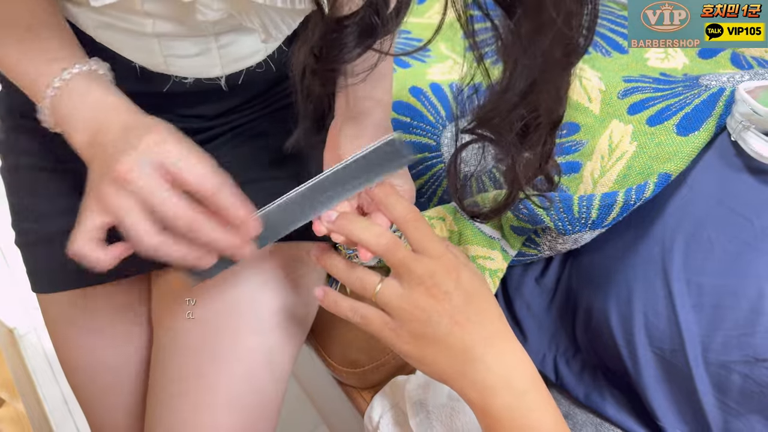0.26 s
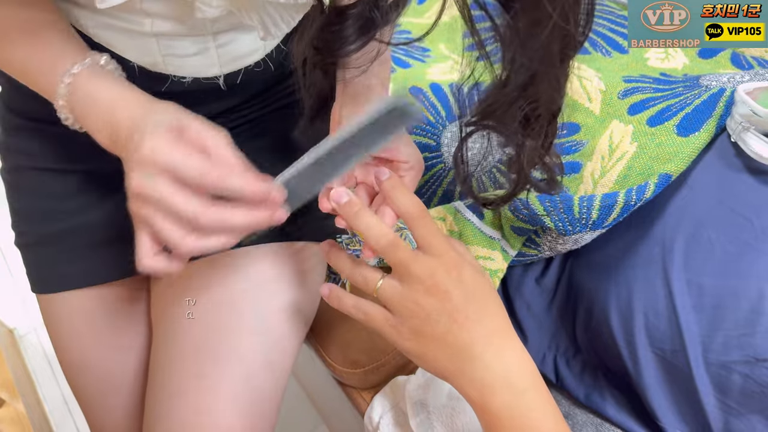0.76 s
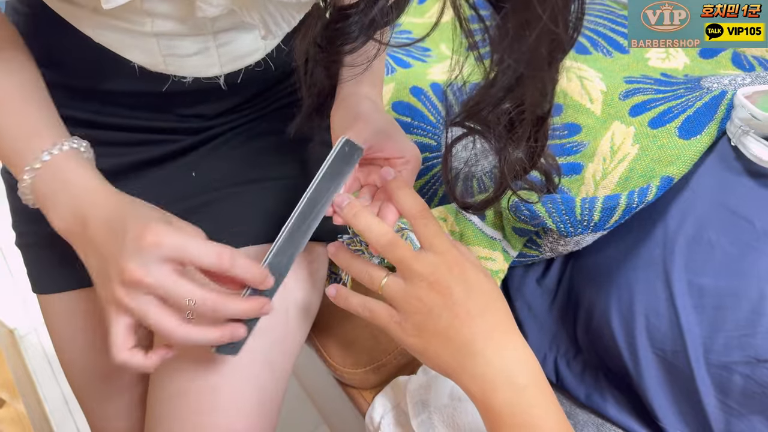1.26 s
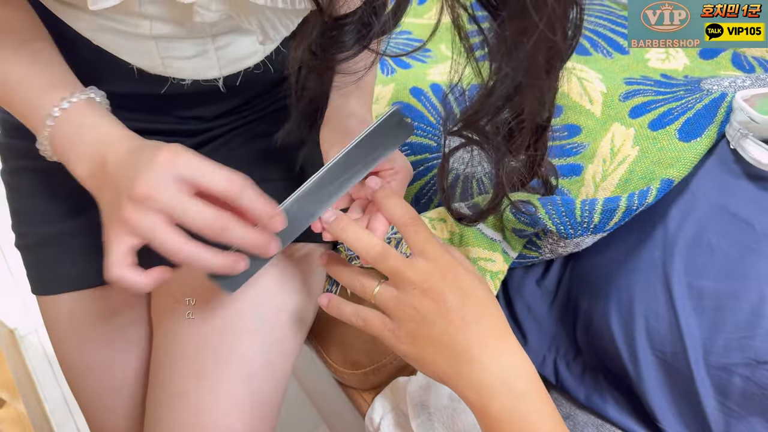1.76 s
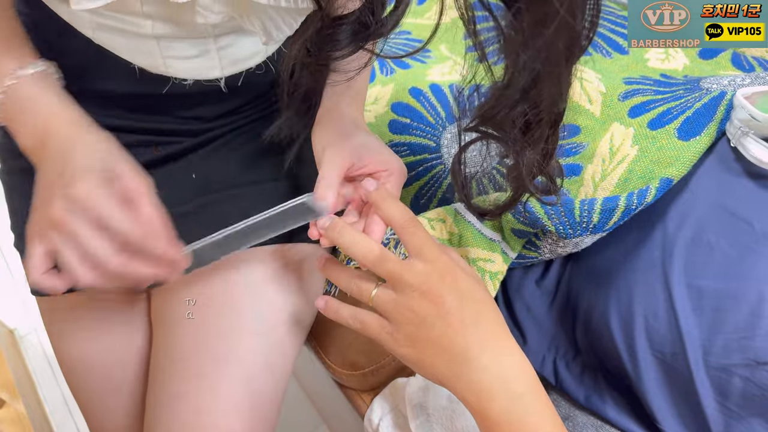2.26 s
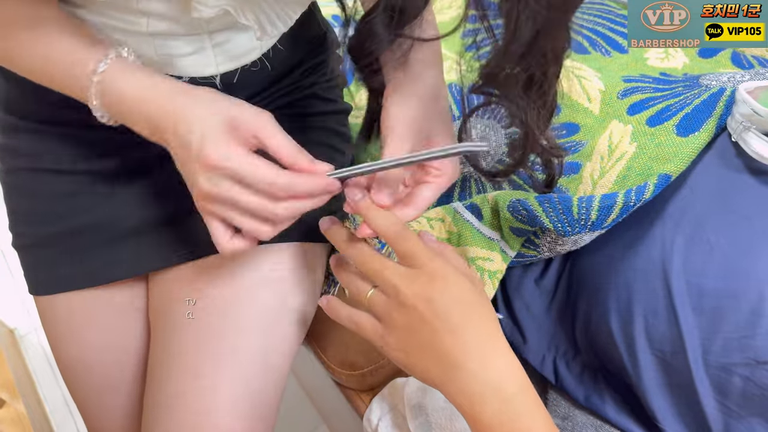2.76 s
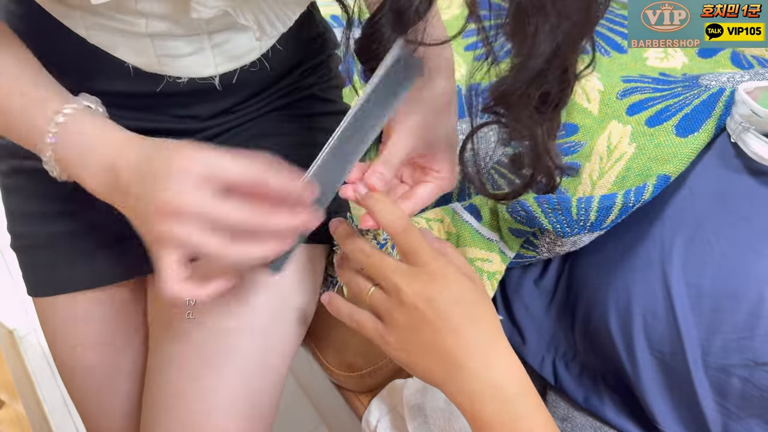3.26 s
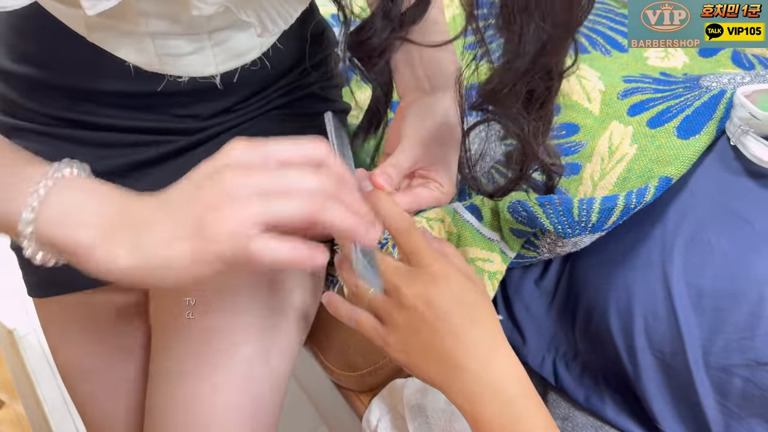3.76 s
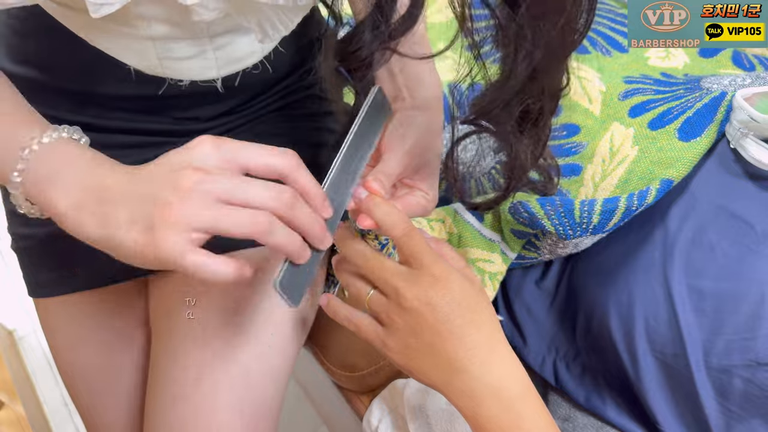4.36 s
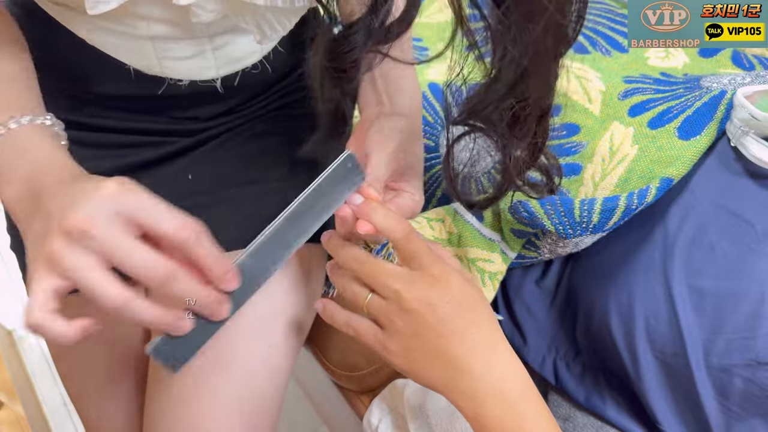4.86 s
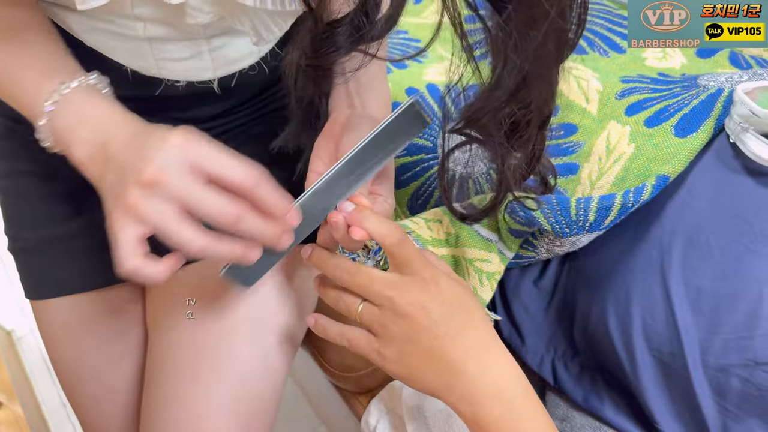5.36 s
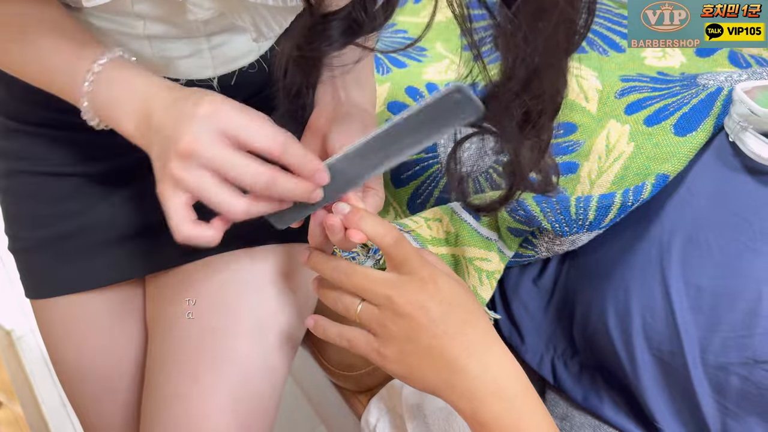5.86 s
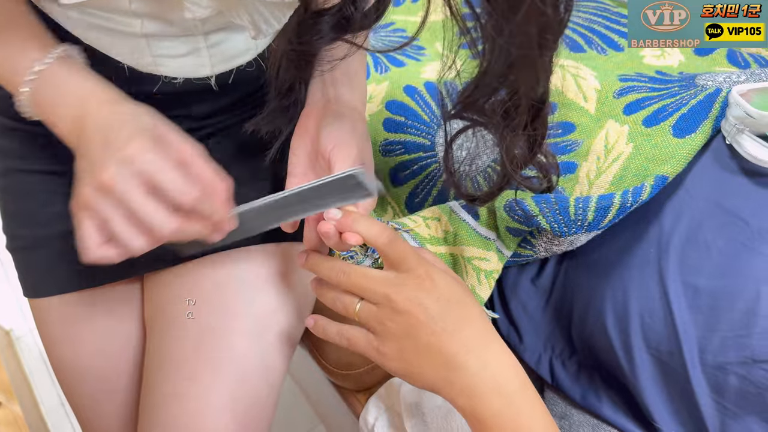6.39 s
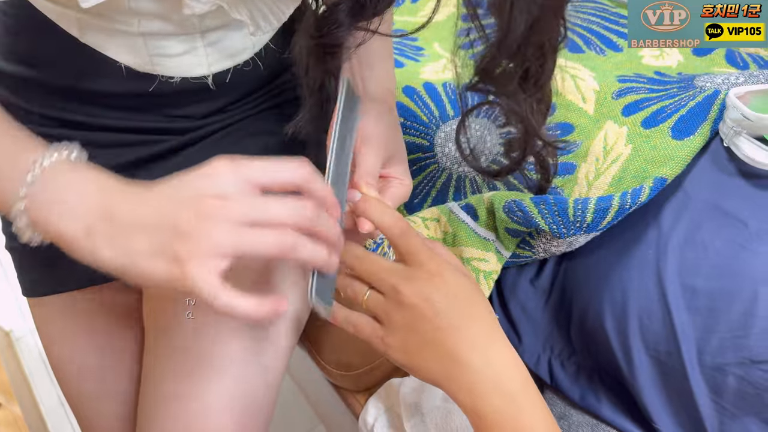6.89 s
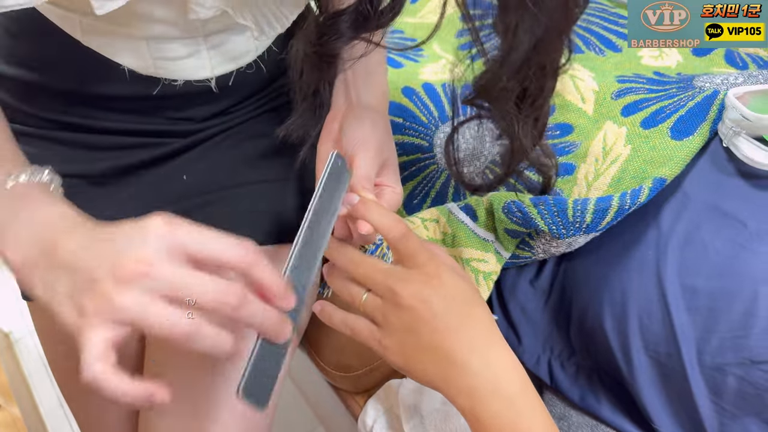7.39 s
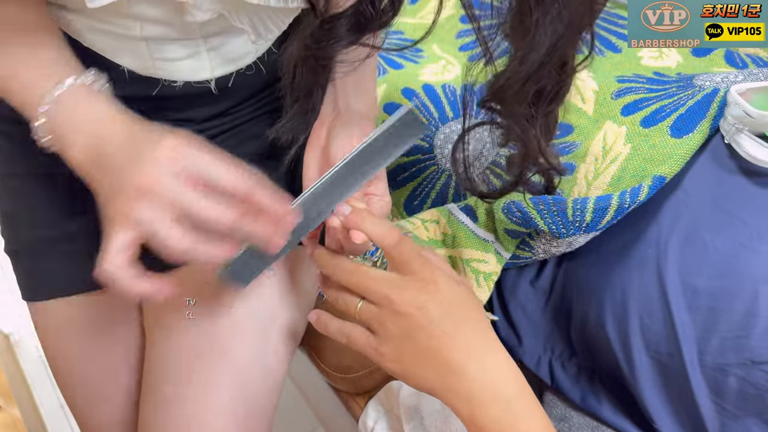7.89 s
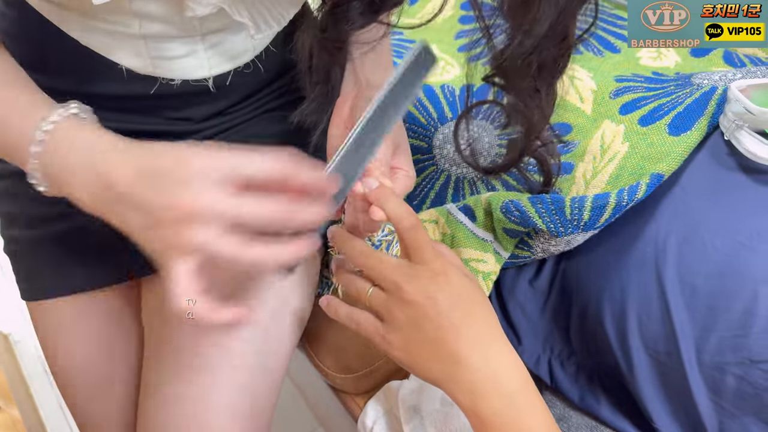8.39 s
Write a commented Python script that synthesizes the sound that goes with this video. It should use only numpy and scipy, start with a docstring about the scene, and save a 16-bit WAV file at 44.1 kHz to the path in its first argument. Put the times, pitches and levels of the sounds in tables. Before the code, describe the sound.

An emery board rasps back and forth over fingernails, close to the microphone in a small shop. The dry, bright strokes come about six a second, in runs broken by short pauses, with the longest run in the middle. Now and then the grit catches with a sharp tick. The hard room carries each stroke on briefly, and ventilation hums low underneath throughout.

```python
"""Filing nails in a small shop

An emery board rasps back and forth over fingernails, close to a two-port microphone. Its grit ticks
against the nail edge, the board rings, and now and then a coarse grain catches. A small hard room
carries each stroke on for a moment. Ventilation adds a low wash and a few wavering hum tones."""
import sys
import numpy as np
from scipy import signal
from scipy.fft import rfft, irfft, next_fast_len
from scipy.io import wavfile
from scipy.ndimage import uniform_filter1d

SR = 44100
rng = np.random.default_rng(int(sys.argv[2]) if len(sys.argv) > 2 else 0)


def generate_wav(sig):
    """Save sig (samples, or channels by samples) to the path in sys.argv[1] as 16-bit PCM at SR."""
    pcm = np.round(np.clip(np.atleast_2d(sig).T, -1, 1) * 32767).astype(np.int16)
    wavfile.write(sys.argv[1], SR, pcm)


N = 380583


def gain_of(db):
    return 10 ** (np.asarray(db) / 20)


def unit_rms(x):
    return x / np.sqrt(np.mean(x ** 2) + 1e-20)


def curve_at(points, hz, column=1):
    table = np.transpose(points)
    return np.interp(np.log(hz + 1), np.log(table[0] + 1), table[column])


def add(mix, start_s, sound):
    part = mix[:, round(start_s * SR):][:, :sound.shape[1]]
    part += sound[:, :part.shape[1]]


def impulse_response(gain):
    """Minimum-phase taps, energy 1, for a gain given over the full circle of frequencies."""
    log_spectrum = np.conj(signal.hilbert(np.log(gain + 1e-5)))
    taps = np.fft.ifft(np.exp(log_spectrum)).real[:len(gain) // 2]
    return taps[None] / np.linalg.norm(taps)


def drift(top_hz, count):
    """Slow wandering curves: sines of random phase, strongest at the slowest."""
    t, hz = np.arange(0, N + 64, 64) / SR, np.geomspace(.15, top_hz, 20)[:, None]
    sines = np.sin(2 * np.pi * (hz * t + rng.random((count, *hz.shape)))) / np.sqrt(hz)
    return np.array([np.interp(np.arange(N) / SR, t, unit_rms(row)) for row in sines.sum(1)])


# The hand's strokes. Each row: start in seconds, length in seconds, peak pressure in dB, place of the
# peak from 0 to 1, board level against the grit in dB, tilt of the grit's top end in dB per octave.
STROKES = [(-0.1, 0.15, -43.5, 0.37, -14.5, -1), (0.048, 0.16, -41.5, 0.55, -15, 2),
           (0.229, 0.17, -40, 0.54, -14, -7), (1.034, 0.21, -47, 0.6, -17, -4),
           (1.26, 0.14, -42.5, 0.58, -18, 1), (1.42, 0.12, -40, 0.5, -20, -2.5),
           (1.57, 0.16, -45.5, 0.49, -13.5, -11), (1.728, 0.18, -45, 0.58, -17.5, -11),
           (1.925, 0.15, -45, 0.48, -14, -13), (2.075, 0.24, -45, 0.67, -15.5, -13),
           (2.77, 0.22, -40.5, 0.66, -10.5, 5.5), (3.362, 0.21, -40.5, 0.57, -16, 3),
           (3.581, 0.12, -41, 0.6, -11.5, -3.5), (3.721, 0.16, -44, 0.62, -11.5, -11),
           (3.895, 0.14, -42.5, 0.55, -13, 0), (4.061, 0.13, -41, 0.47, -15.5, 2),
           (4.218, 0.14, -41.5, 0.39, -17.5, 6), (4.371, 0.13, -37.5, 0.55, -17, 1),
           (4.515, 0.18, -39, 0.66, -17.5, 9), (4.72, 0.16, -45, 0.39, -16, 0),
           (4.899, 0.13, -40, 0.49, -17, 1.5), (5.062, 0.154, -44.5, 0.55, -17.5, -7.5),
           (5.251, 0.11, -39, 0.51, -16.5, 1.5), (5.419, 0.17, -38, 0.5, -19, -4.5),
           (5.924, 0.16, -43.5, 0.38, -13.5, -5.5), (6.1, 0.14, -47.5, 0.43, -11, -6.5),
           (6.281, 0.23, -43, 0.63, -14.5, -9), (6.858, 0.18, -40.5, 0.56, -16.5, 8),
           (7.041, 0.16, -44.5, 0.47, -12, 4), (7.21, 0.15, -41, 0.58, -17, -6.5),
           (7.389, 0.15, -40, 0.49, -16, 12.5), (7.584, 0.15, -42.5, 0.4, -19.5, 5),
           (7.771, 0.16, -44.5, 0.53, -18, 2), (7.98, 0.11, -43.5, 0.65, -16, -8),
           (8.503, 0.22, -44, 0.5, -19.5, -5)]
EDGE_S = .002  # fade as the board meets or leaves the nail


def strokes(turn_speed=.027, grit_power=.98, board_power=.67, ring_up_s=.0051):
    """Pressure follows the arch of hand speed; the board's ring builds later and follows more gently."""
    t, touching = np.arange(N) / SR, contact()
    keep = np.exp(-1 / (ring_up_s * SR))
    lagging = signal.lfilter([1 - keep], [1, -keep], touching - 1) + 1
    gates = np.array([touching, np.minimum(touching, lagging)])[:, None]
    powers = np.array([grit_power, board_power])[:, None, None]
    for start, length, db, peak_place, board_db, tilt_db in STROKES:
        span = slice(max(round(start * SR), 0), round((start + length) * SR))
        skew = np.log(.5) / np.log(peak_place)
        progress = np.clip((t[span] - start) / length, 0, 1) ** skew
        speed = turn_speed + (1 - turn_speed) * np.sin(np.pi * progress)
        yield span.start, gain_of(db) * speed ** powers * gates[..., span], board_db, tilt_db


# Nail and grip colour the board's ring. Each row: time in seconds, then low, middle and high modes in dB.
GRIP = [(.2, 2.5, -2, -3.5), (1.1, -4.5, 0.5, 1), (2.3, -9, -8, -5), (2.85, 0, -14, -1.5),
        (3.45, 4.5, 0, 0), (3.9, -0.5, 4.5, 3.5), (4.6, 2.5, -0.5, 1), (6.0, 1.5, 1.5, -3),
        (6.4, -4, -12, -7.5), (7.0, 5, -1, 2.5), (8.1, -5, 0, -1.5)]


def rasp(grains_per_s=9000, spread_db=3.1, clump_db=1.2, clump_s=.0012):
    """Grains of uneven size tick against the nail in clumps, as hard as the hand presses."""
    count = N + SR
    clumps = unit_rms(uniform_filter1d(rng.standard_normal(count), round(clump_s * SR)))
    sizes = gain_of(spread_db * np.minimum(rng.exponential(1, count), 4) + clump_db * clumps)
    ticks = sizes * (rng.random(count) < grains_per_s / SR)
    jolts = np.sqrt(ticks)  # the board's mass evens out large and small grains
    grains = np.array([[unit_rms(ticks)], [unit_rms(jolts)]]) * rng.choice([-1., 1.], (2, 2, count))
    grip_times, *grip_levels = np.transpose(GRIP)
    out = np.zeros((2, N))
    for at, pressure, board_db, tilt_db in [*strokes(), *grazes()]:
        drive = pressure * grains[..., at:at + pressure.shape[-1]]
        groups_db = [np.interp(at / SR, grip_times, db) for db in grip_levels]
        add(out, at / SR, scrape(drive, board_db, tilt_db, groups_db))
    return out


# The grit's bright hiss. Each row: frequency in Hz, relative level in dB.
GRIT_SPECTRUM = [(4000, -23), (6700, -16), (7600, -11.5), (9000, -1.5), (10300, 0.5), (11200, 0.5),
                 (11900, 3), (14000, -1), (15800, -4)]
# The board's resonances. Each row: frequency in Hz, width in Hz, relative level in dB.
BOARD_MODES = [(562, 253, 0), (1100, 380, -2), (1890, 720, -5), (2780, 790, -5), (3466, 455, -1),
               (4480, 660, -2), (5390, 610, 1), (6090, 800, -0.5), (7540, 560, 1.5)]
# Upper ends of the low, middle and high groups of modes, in Hz.
GROUP_TOPS_HZ = [2400, 3100, 4900]


def scrape(drive, board_db, tilt_db, groups_db):
    """The first drive signal makes the grit hiss, the second rings the board's modes."""
    hz = abs(np.fft.fftfreq(1024, 1 / SR))
    grit_db = curve_at(GRIT_SPECTRUM, hz) + tilt_db * np.log2(np.clip(hz / 11500, .7, 1.2))
    board_power = np.zeros_like(hz)
    for mode_hz, width, db in BOARD_MODES:
        group_db = [*groups_db, 0][np.searchsorted(GROUP_TOPS_HZ, mode_hz)]
        board_power += gain_of(db + group_db) ** 2 / (1 + (2 * (hz - mode_hz) / width) ** 4)
    hiss = signal.fftconvolve(drive[0], impulse_response(gain_of(grit_db)), axes=1)
    ring = signal.fftconvolve(drive[1], impulse_response(np.sqrt(board_power)), axes=1)
    return hiss + gain_of(board_db) * ring


# Shimmer on the rasp. Each row: frequency in Hz, typical depth in dB.
SHIMMER_DEPTH = [(6000, 4.8), (12000, 2.4)]


def rasp_shimmer(x):
    """Small random peaks come and go over the rasp's spectrum, giving it a faint ringing shimmer."""
    hz, t, spectrum = signal.stft(x, SR, nperseg=512, noverlap=384)
    lingering = uniform_filter1d(rng.standard_normal((len(t), len(hz))), size=12, axis=0)
    peaks = unit_rms(uniform_filter1d(lingering, size=2, axis=1)).T
    gain = gain_of(curve_at(SHIMMER_DEPTH, hz)[:, None] * peaks)
    gain /= np.sqrt(np.mean(gain ** 2, axis=1, keepdims=True))
    return signal.istft(spectrum * gain, SR, nperseg=512, noverlap=384)[1][:, :N]


# The room's tail. Each row: frequency in Hz, seconds to fall 60 dB, level against the dry sound in dB.
ROOM_TAIL = [(983, 0.68, -9), (3930, 0.44, -1.5), (7250, 0.55, -8), (9600, 0.48, -13.5), (15600, 0.19, -10)]


def room(x):
    """Sparse reflections, each band dying at its own speed; soft furnishings soak up the treble."""
    taps = np.zeros((2, 30000))
    slots = np.arange(200, 29900, 20)
    arrivals = slots + rng.integers(0, 20, (2, len(slots)))
    np.put_along_axis(taps, arrivals, rng.choice([-1., 1.], arrivals.shape), axis=1)
    hz, t, spectrum = signal.stft(taps, SR, nperseg=256)
    t60 = curve_at(ROOM_TAIL, hz)[:, None]
    band_energy = SR / 20 * t60 / (2 * np.log(1000))
    decay = gain_of(curve_at(ROOM_TAIL, hz, column=2)[:, None] - 60 * t / t60) / np.sqrt(band_energy)
    tail = signal.istft(spectrum * decay, SR, nperseg=256)[1]
    return signal.fftconvolve(x, tail, axes=1)[:, :N]


# The bed of moving air. Each row: frequency in Hz, relative level in dB.
WASH_SPECTRUM = [(20, -27.5), (42, -17.5), (55, -4), (80, -10), (125, -12.5), (200, -8), (270, -10.5),
                 (350, -16), (520, -23), (1430, -30), (2000, -30.5), (2600, -43), (3500, -46), (5000, -52),
                 (9000, -65), (13000, -68), (15000, -88)]


def ventilation_wash(level_db=-51.5, patchy_db=1.24, swell_db=1.0, swell_below_hz=400):
    """Air noise with faint drifting patches; the bass slowly swells and sinks."""
    frames, hz = N // 1024 + 6, np.fft.rfftfreq(4096, 1 / SR)
    draws = rng.standard_normal((frames, len(hz), 5)).T
    noise = draws[[0, 2]] + 1j * draws[[1, 3]]
    patches = unit_rms(uniform_filter1d(uniform_filter1d(draws[4], 30, axis=0), 4, axis=1))
    swell_depth = swell_db / (1 + (hz / swell_below_hz) ** 2)
    swell = np.outer(swell_depth, np.resize(drift(top_hz=7.3, count=1)[0, ::1024], frames))
    spectrum = noise * gain_of(curve_at(WASH_SPECTRUM, hz)[:, None] + patchy_db * patches + swell)
    air = signal.istft(spectrum, nperseg=4096, noverlap=3072)[1][:, :N]
    return gain_of(level_db) * unit_rms(air)


# The drone. Each row: pitch in Hz, width of its noise band in Hz, noise level in dB, sine level in dB.
HUM_TONES = [(60.57, 33, -68, -65.5), (94.3, 16.5, -56.5, -59), (171.7, 24.4, -57.5, -65.5),
             (296.8, 31, -60, -59), (492.4, 43, -72, -77.5), (543.4, 6.9, -76, -79.5), (790, 18, -81, -87)]


def ventilation_hum(waver=.004, throb_db=1.2):
    """Each tone is a wavering sine inside a narrow band of noise, as from motors and ducts."""
    out, settle = np.zeros((2, N)), SR // 4
    for hz, width, noise_db, sine_db in HUM_TONES:
        bend, throb = drift(top_hz=4., count=2)
        pole = np.exp(-np.pi * width / SR)
        noise = rng.standard_normal((2, N + settle, 2)) @ [1, 1j]
        fuzz = signal.lfilter([1], [1, -2 * pole, pole ** 2], noise)[:, settle:]
        fuzz *= gain_of(noise_db) / np.sqrt(np.mean(abs(fuzz) ** 2))
        sine_level = gain_of(sine_db + throb_db * throb) * [[1], [1j]]  # rows a quarter cycle apart
        carrier = np.exp(2j * np.pi * np.cumsum(hz * (1 + waver * bend)) / SR)
        out += np.sqrt(2) * ((fuzz + sine_level) * carrier).real
    return out


# Single sharp ticks. Each row: start in seconds, level in dB, board level against the grit in dB.
CATCHES = [(0.2754, -30, -32), (1.4366, -41.5, -24), (2.819, -39, -19), (3.391, -44, -20),
           (4.079, -44, -22), (4.4226, -29, -28), (6.03, -33, -24), (6.812, -43, -12), (7.993, -46, -27),
           (8.0874, -34.5, -0.5), (8.0913, -30, -10), (8.465, -60, 4.5)]
# Levels of the low, middle and high modes in a tick, in dB.
TICK_GROUPS_DB = (2, -6.5, 11)


def catches(decay_s=.0011):
    """A coarse grain catches, or the board taps or leaves the nail: one tiny burst of noise."""
    out = np.zeros((2, N))
    burst = np.exp(-np.arange(400) / SR / decay_s)
    for start, db, board_db in CATCHES:
        noise = rng.standard_normal((2, len(burst) + 1))
        sharp = np.diff(noise)  # a short tick carries little bass
        drive = gain_of(db) * burst * np.array([noise[:, 1:], sharp])
        add(out, start, scrape(drive, board_db, tilt_db=0, groups_db=TICK_GROUPS_DB))
    return out


# Light lead-in touches. Each row: start and end in seconds, then starting and ending level in dB.
GRAZES = [(0.992, 1.046, -84, -61), (2.77, 2.813, -72, -55), (3.3, 3.388, -72.5, -73),
          (5.84, 5.924, -80, -55.5), (6.795, 6.885, -65.5, -68), (7.934, 7.988, -69, -71),
          (8.456, 8.513, -80, -69)]


def grazes(board_db=-14, tilt_db=0):
    """The board brushes the nail with faint pressure before it bears down."""
    for start, end, start_db, end_db in GRAZES:
        count = round((end - start + EDGE_S) * SR)
        fades = signal.windows.tukey(count, 2 * EDGE_S * SR / count)
        pressure = fades * gain_of(np.linspace(start_db, end_db, count))
        yield round(start * SR), pressure, board_db, tilt_db


def contact(slip_at_s=8.092):
    """1 while the board can bear on the nail, 0 while it only grazes or has slipped off mid-stroke."""
    t, touching = np.arange(N) / SR, np.ones(N)
    for start, end, *_ in [*GRAZES, (slip_at_s, slip_at_s + .1)]:
        touching[(t >= start) & (t < end)] = 0
    return uniform_filter1d(touching, round(EDGE_S * SR))


def scene():
    """Row 0 is the sound field at the left port, row 1 an unrelated draw of the same field."""
    filing = rasp_shimmer(rasp()) + catches()
    return filing + room(filing) + ventilation_wash() + ventilation_hum()


# The microphone's stereo image. Each row: frequency in Hz, likeness of the ports from 0 to 1,
# the right port's lead in radians, left level over right in dB.
MIC_PORTS = [(100, .985, .05, 1.3), (300, .77, .25, 1.1), (700, .33, .3, 1.5), (1300, .25, .6, 2.),
             (1900, .3, 2.8, 1.5), (2300, .3, .1, -.5), (3000, .45, -1.5, 0), (3700, .75, -3.1, 1.5),
             (4700, .25, -3.1, 4.), (5900, .55, -3.2, 4.), (6700, .3, -.4, 3.), (7400, .5, -2.5, 1.5),
             (8500, .96, -3.1, .3), (10700, .8, -2.75, .3), (12000, .83, -1.9, 0), (16000, .74, -.5, 0)]
BAND_LIMIT_HZ = 15720


def record(dry):
    """The right port hears a phase-turned share of the left one's field plus its own; then a low-pass."""
    size = next_fast_len(N + 4096)
    hz = np.fft.rfftfreq(size, 1 / SR)
    left, unrelated = rfft(dry, size)
    likeness, lead, balance_db = (curve_at(MIC_PORTS, hz, column) for column in (1, 2, 3))
    right = likeness * np.exp(1j * lead) * left + np.sqrt(1 - likeness ** 2) * unrelated
    lean = gain_of(balance_db / 2)
    stereo = irfft(np.array([left * lean, right / lean]), size)[:, :N]
    lowpass = signal.firwin(801, BAND_LIMIT_HZ, window=("kaiser", 9), fs=SR)
    return signal.oaconvolve(stereo, lowpass[None], "same")


dry = scene()
out = record(dry)
generate_wav(out)
```